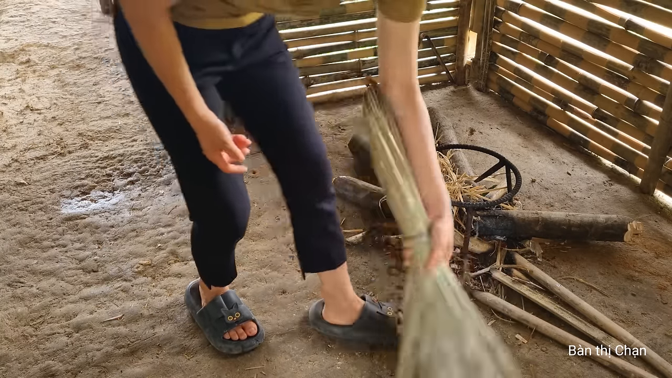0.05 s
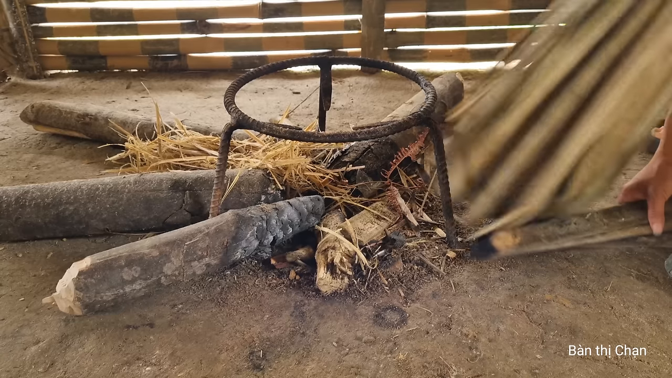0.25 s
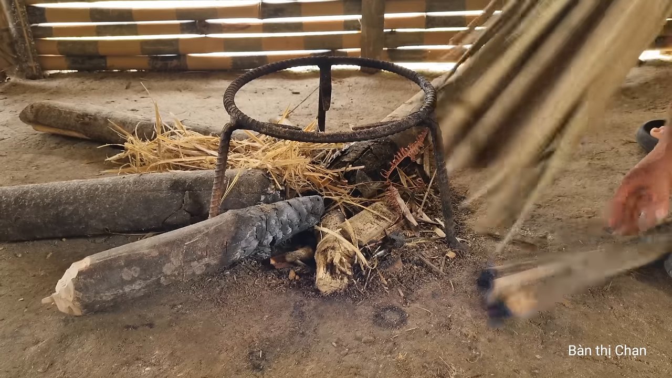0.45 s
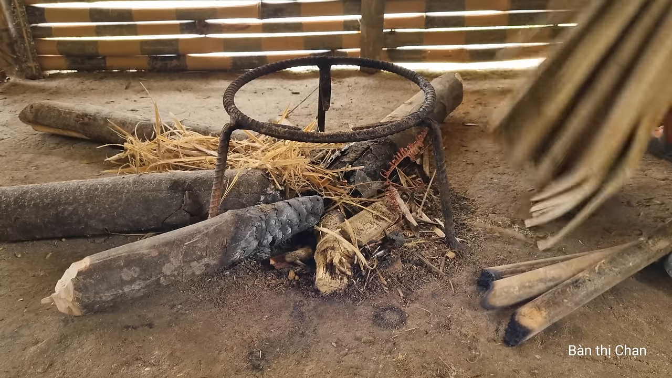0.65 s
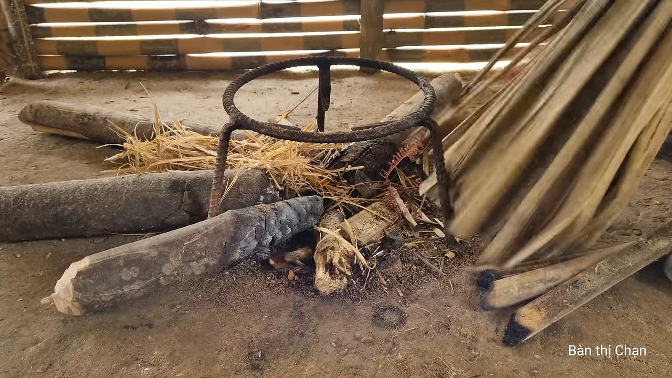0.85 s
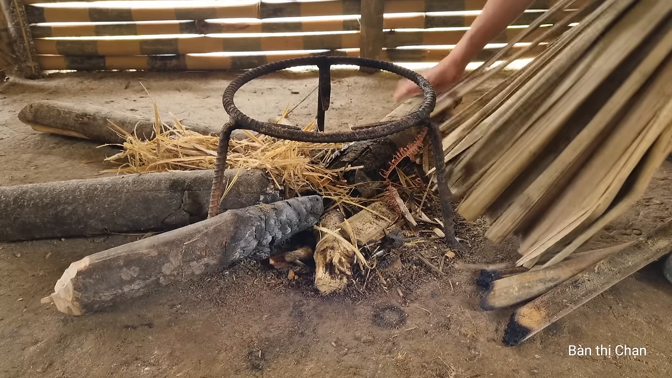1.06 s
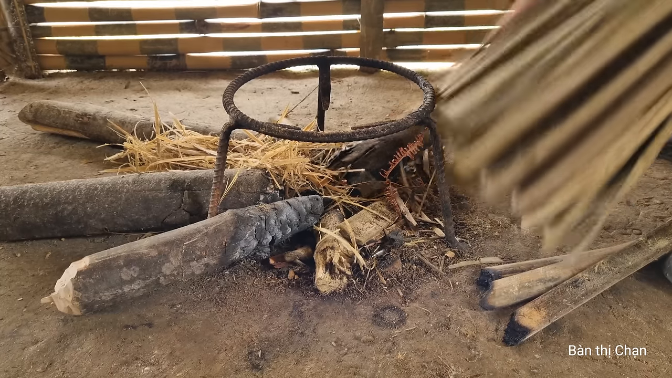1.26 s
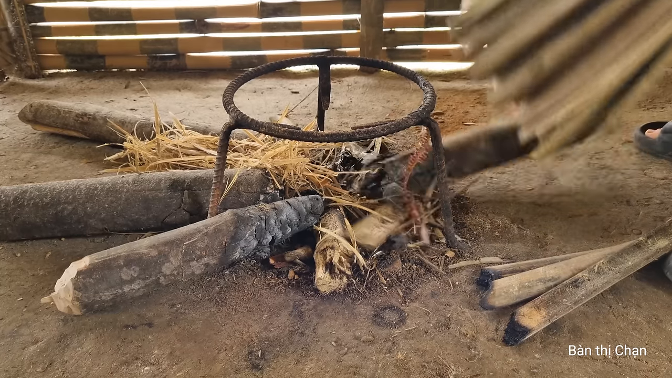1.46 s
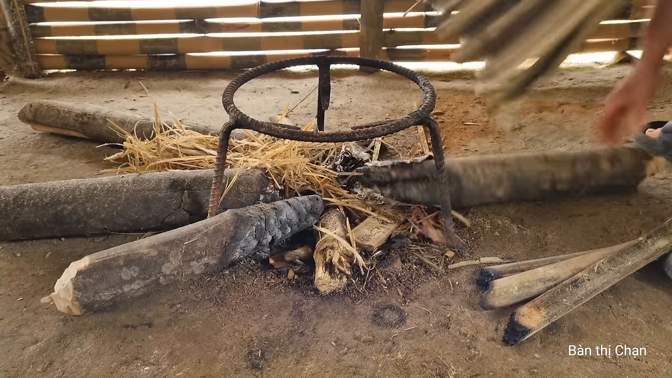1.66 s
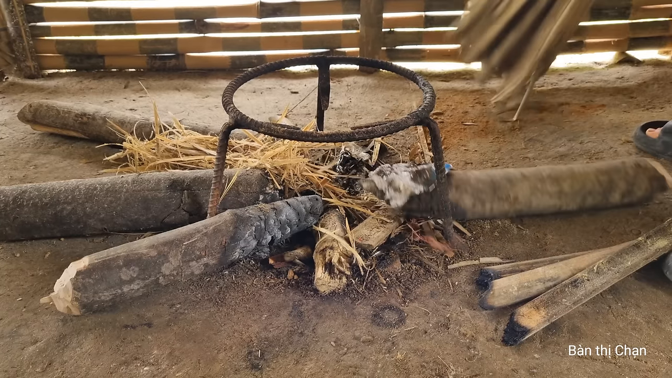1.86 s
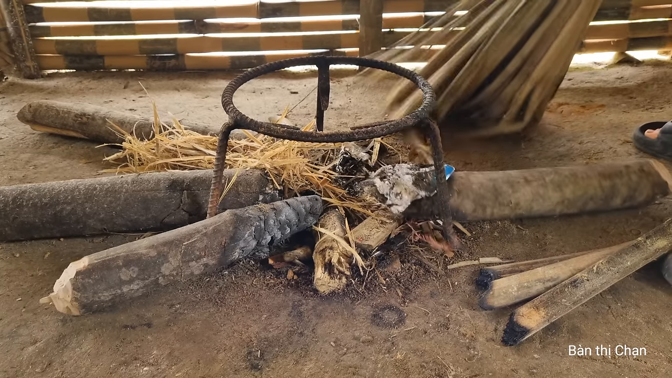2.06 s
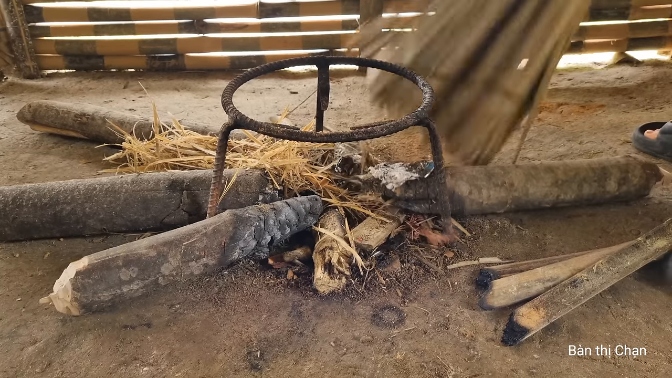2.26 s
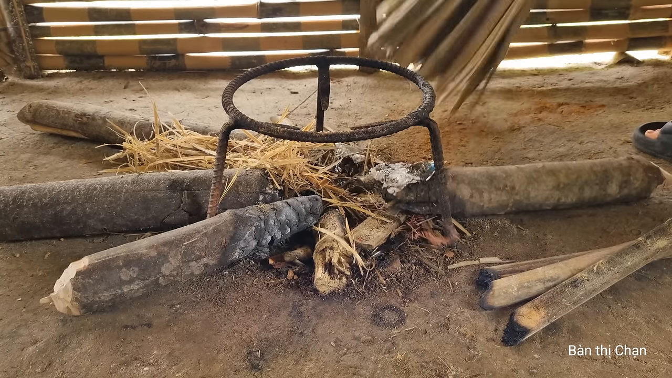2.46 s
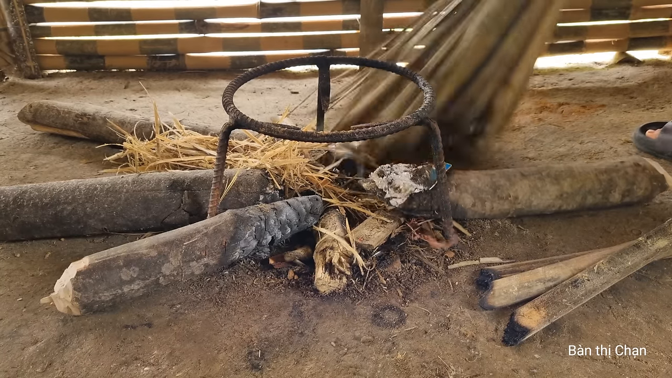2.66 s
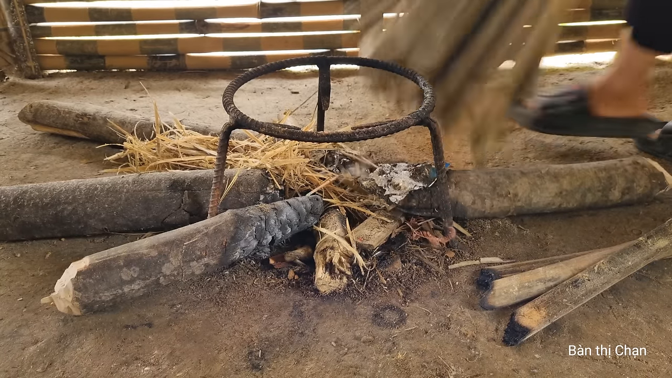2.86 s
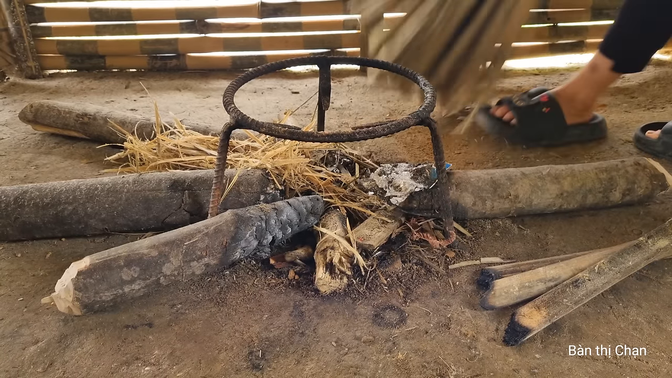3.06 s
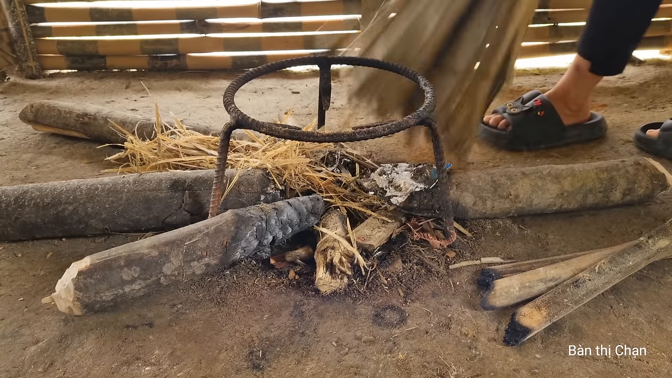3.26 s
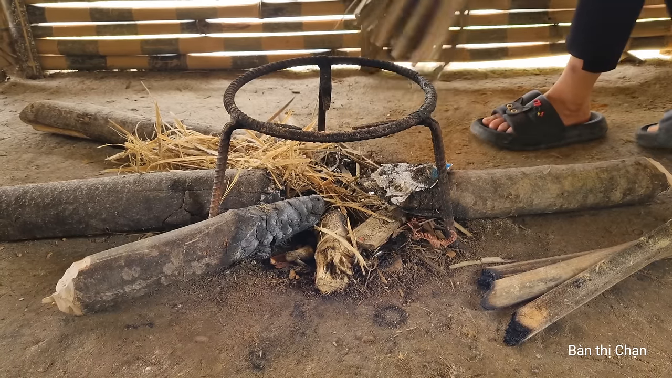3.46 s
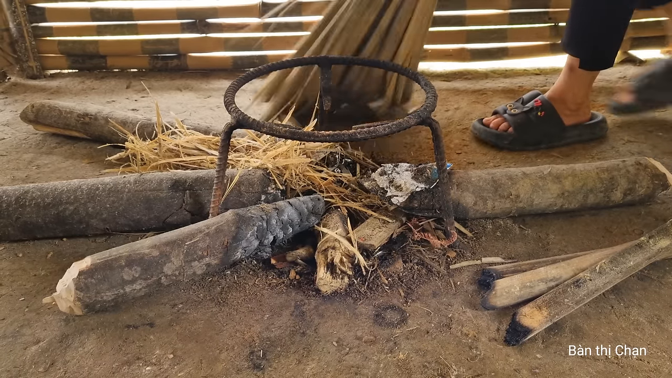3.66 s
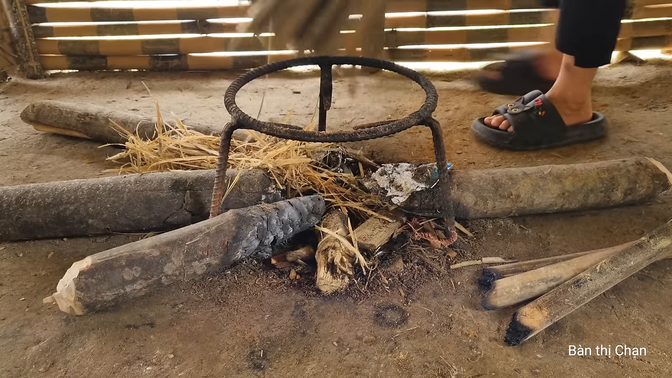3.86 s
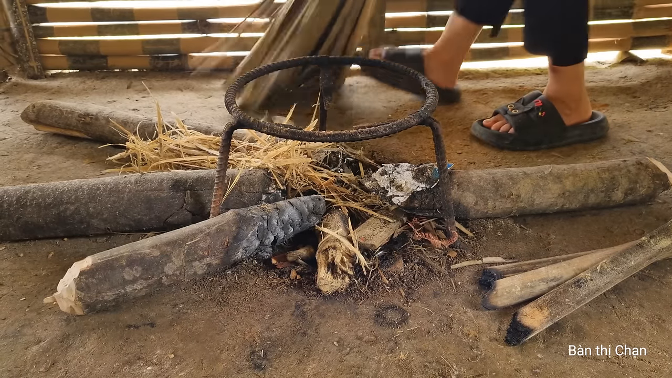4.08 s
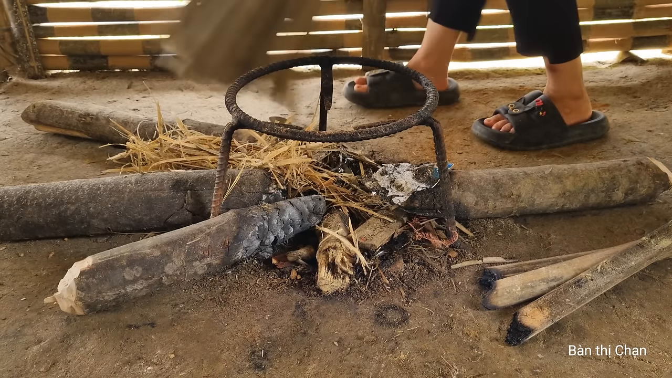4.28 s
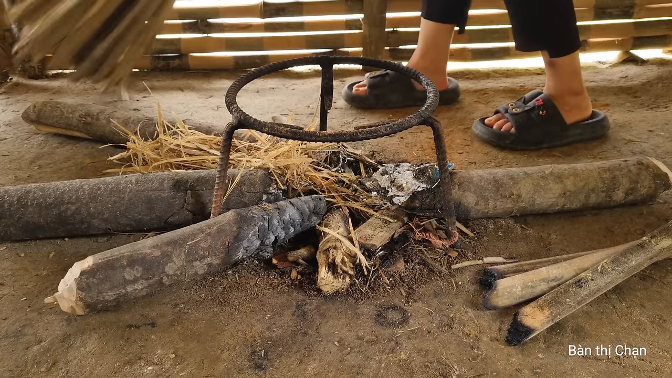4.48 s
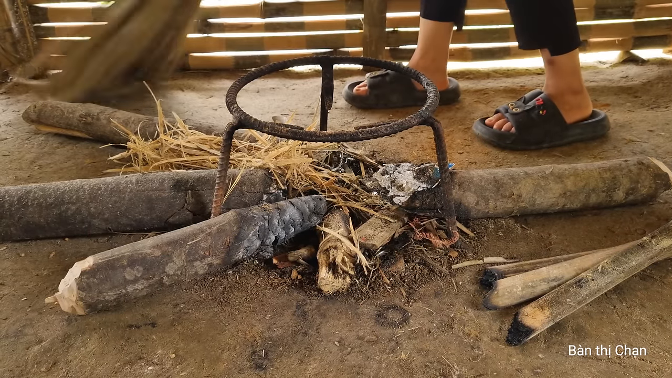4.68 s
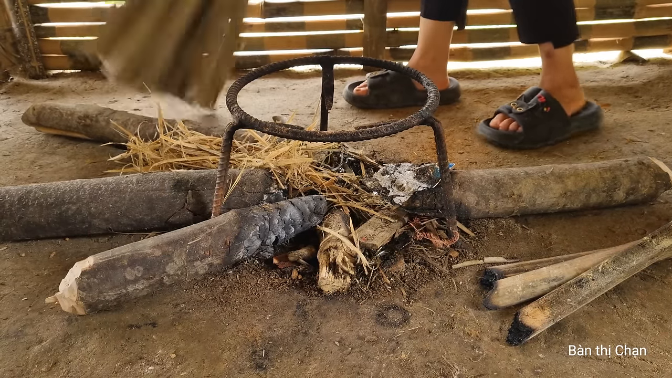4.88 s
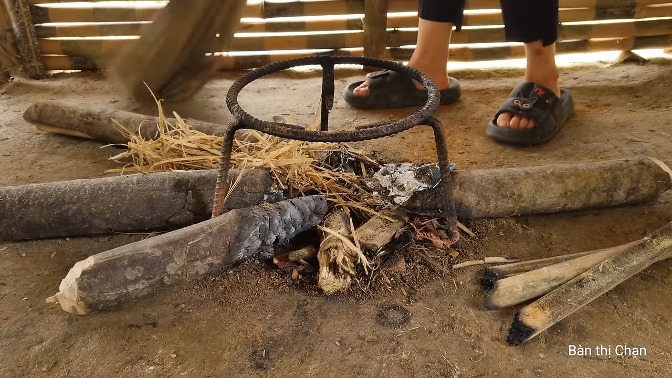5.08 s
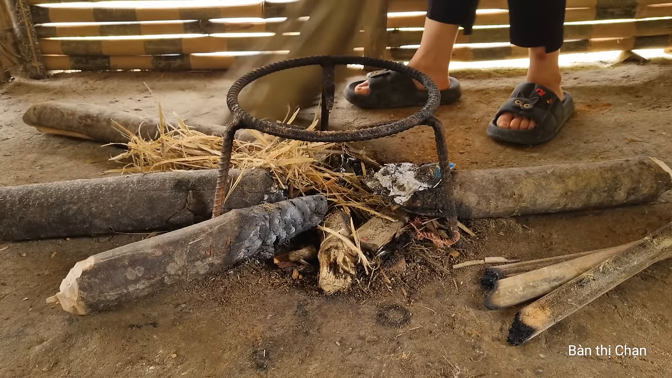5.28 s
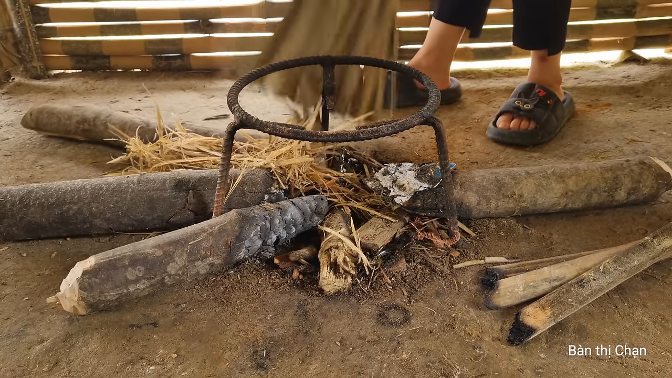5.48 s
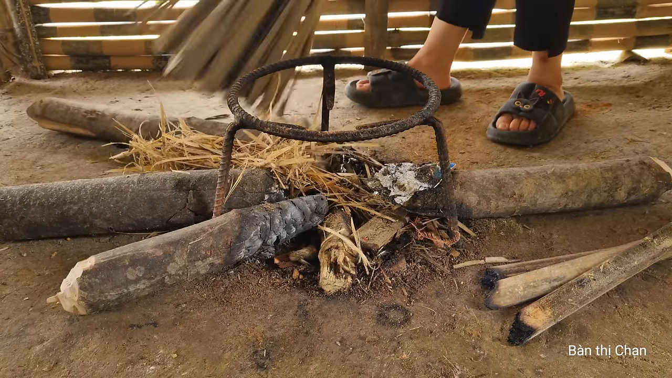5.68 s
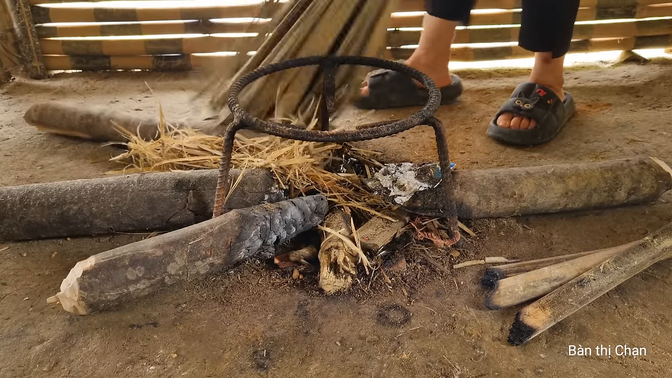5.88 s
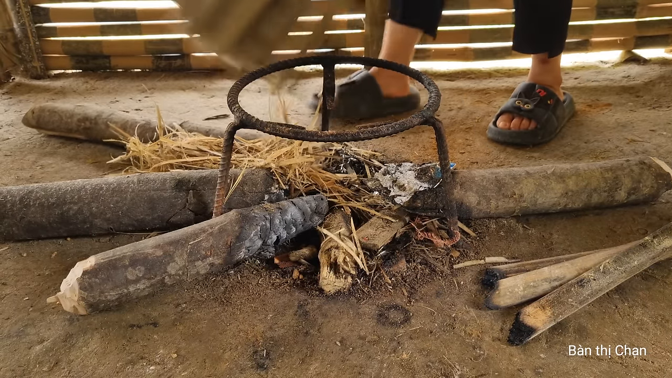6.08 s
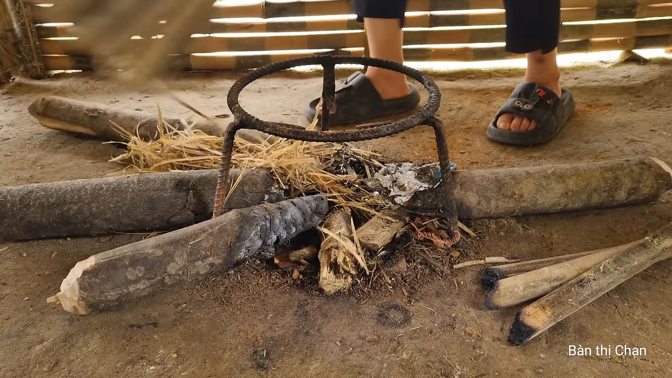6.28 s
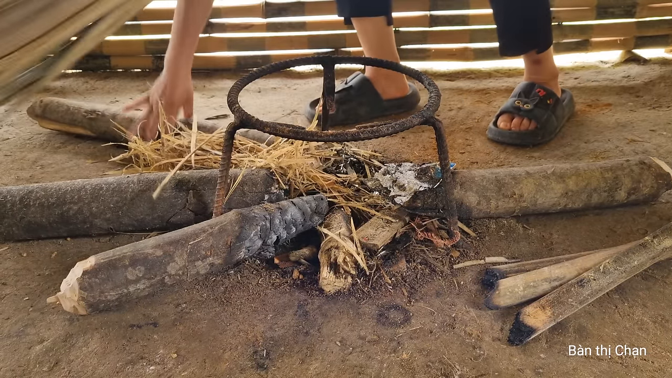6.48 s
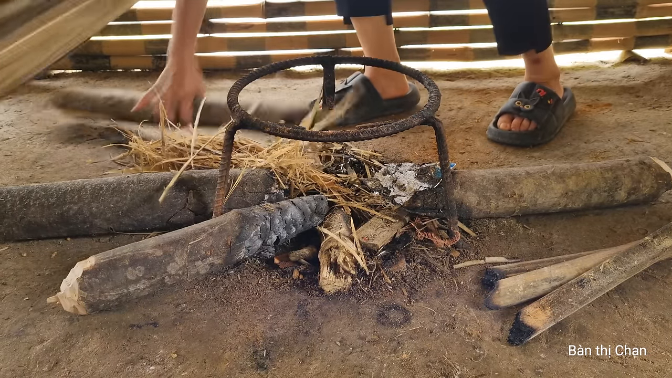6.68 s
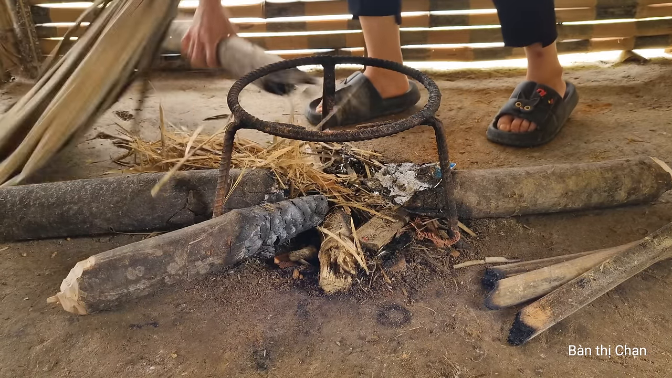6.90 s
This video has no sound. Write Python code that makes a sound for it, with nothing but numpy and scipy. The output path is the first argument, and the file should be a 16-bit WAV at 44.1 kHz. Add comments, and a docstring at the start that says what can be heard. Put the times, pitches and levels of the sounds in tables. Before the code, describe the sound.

A palm-leaf broom sweeps packed earth in brisk dry strokes; a stick clatters down, a log thuds softly, straw crackles and small scuffs follow.

```python
"""Broom on an earth floor

A palm-leaf broom sweeps the packed earth of a slatted bamboo hut, about two strokes a second:
noise bands for floor thrum, catching leaf tips and swishing blades follow each stroke's effort.
Noise puffs and ringing modes make a clattering stick, a thudding log, straw, scuffs, footfalls
and a hollow knock. Sparse dull echoes, a faint wavering low drone and a thin hiss lie behind.
"""
import sys
import numpy as np
from scipy import signal
from scipy.fft import rfft, irfft
from scipy.io import wavfile
from scipy.ndimage import map_coordinates

SR = 44100
rng = np.random.default_rng(int(sys.argv[2]) if len(sys.argv) > 2 else 0)


def wav_out(sig):
    """Save sig, one row per channel (or a flat mono array), as 16-bit PCM at SR to the path in sys.argv[1]."""
    wavfile.write(sys.argv[1], SR, np.round(np.clip(np.atleast_2d(sig).T, -1, 1) * 32767).astype(np.int16))


N = 306054
TIME_S = np.arange(N) / SR
CUTOFF_HZ = 15550
EFFORT_STEP = 32   # samples between effort readings

# All dB are relative: mix gains and filters follow.
# Broom strokes: (touchdown [s], contact length [s], settling time [s], drag [dB],
# push peak after touchdown [s], push half-width [s], push [dB], extra swish [dB], extra thrum [dB])
STROKES = [(0.0, .375, .025, -36.5, .19, .06, 13, -1.2, 0), (.41, .11, .04, -37, .09, .025, 2.5, 3, -3),
           (0.68, .36, .04, -47, .16, .076, 15.4, -1.4, -3), (1.195, .16, .02, -44, .08, .048, 4, .8, -5.5),
           (1.852, .47, .127, -32, .262, .045, 7.8, 0, .8),
           (2.528, .372, .04, -33.3, .157, .054, 10.3, .3, 1.5),
           (3.091, .227, .04, -32.5, .125, .041, 7.6, -1, 1),
           (3.51, .285, .025, -30.5, .175, .043, 5.8, 2.1, .5),
           (3.972, .353, .065, -40.5, .106, .134, 12, .4, -2), (4.52, .415, .068, -37, .31, .049, 9, 0, -1),
           (5.06, .493, .07, -35.5, .25, .11, 10.3, 0, -1.5),
           (5.749, .336, .053, -42, .12, 0.08, 14.3, -1.2, -1.5),
           (6.8, .18, .082, -38.6, .099, .022, 8, 2.5, -3)]
# Broom position: (time [s], left-ear lag [samples])
BEARING = [(0, 4), (2, 5), (3.4, 0.5), (4.2, -0.5), (4.8, -5.5), (5.4, -1.5), (6.9, -3.5)]
# Leaves and straw rustling, during and between strokes: (time [s], level [dB])
RUSTLE = [(0, -44), (.35, -36), (.59, -51), (.88, -34), (1.11, -53), (1.46, -43.5), (1.81, -55),
          (2.42, -53), (3.06, -52), (3.42, -50), (3.99, -42), (4.4, -52), (5.01, -46), (5.66, -53),
          (6.24, -50), (6.43, -55.5), (6.75, -55)]

# Spectra of floor thrum, leaf tips, blades, hiss: (frequency [Hz], gain [dB])
THRUM_SPECTRUM = [(22, -36), (33, -21), (45, -11.5), (62, 1), (85, 1.5), (140, -1.5), (195, 5.5),
                  (260, -1.5), (380, -2), (600, -38.5)]
SCRAPE_SPECTRUM = [(160, -27), (290, 1), (390, -7), (445, -2.5), (515, 4), (630, 1.5), (750, -1.5),
                   (1000, 0), (1600, -.5), (2300, -3.5), (3500, -8), (7000, -33), (15000, -26)]
SWISH_SPECTRUM = [(500, -15), (1400, -2.5), (2600, -0.5), (4000, 0), (6000, -2.5), (8100, -2), (9400, -7.5),
                  (15000, -7)]
AIR_SPECTRUM = [(20, -23), (45, -6), (120, -2.5), (450, -2), (1200, -29), (4000, 2), (7700, 3),
                (9500, -1.5), (15000, -3)]
# Spectra of stick contact, thud, straw snap, scuff: (frequency [Hz], gain [dB])
CLACK_SPECTRUM = [(30, -54), (100, -8), (300, -8), (600, 4.5), (800, -4), (1450, 10.5), (2100, -9.5),
                  (3000, 1.5), (3600, -2), (4400, 0), (5600, -1.5), (6500, -13), (8200, -7.5), (10000, -22),
                  (15000, -36)]
THUD_SPECTRUM = [(20, -38), (35, -13), (70, -3), (170, 3), (400, -4), (650, -9.5), (1200, -25), (1800, -15),
                 (2400, -25), (15000, -39)]
SNAP_SPECTRUM = [(40, -26), (300, -5.5), (1500, -27), (3500, -5.5), (6000, -2), (8300, -3), (10000, -5),
                 (15000, -6)]
SCUFF_SPECTRUM = [(30, -27), (100, 0), (400, -3), (900, 7), (1800, 5.5), (3000, 0.5), (5000, -7),
                  (8000, -7), (15000, -23)]
# Left-right likeness: (frequency [Hz], correlation [-1 to 1])
LIKENESS = [(60, 0.98), (280, 1), (540, 0.87), (820, 0.35), (1500, 0.32), (2600, 0.26), (4000, 0.042),
            (15000, .03)]
# Stereo balance: (frequency [Hz], left minus right [dB])
BALANCE = [(60, 2), (300, 1.6), (1000, 0), (2000, 1.2), (4500, -1), (8000, -3), (14000, -2.5)]

# Dry leaves and straw snap: (time [s], level [dB], t60 [s])
SNAPS = [(.717, -36, 0.067), (1.45, -34, .02), (1.462, -34, 0.056), (1.574, -37, .012), (1.618, -35, 0.09),
         (1.784, -33, 0.014), (1.881, -28.5, 0.043), (3.455, -34.5, 0.077), (4.608, -29, 0.021),
         (6.777, -27.5, 0.14)]
# Straw crackles under the moved log: (start [s], end [s])
CRACKLING = (1.39, 2.1)
# Broom, sandal or hand scuffs the ground: (time [s], level [dB], t60 [s])
SCUFFS = [(.122, -31, .11), (.634, -37, .06), (.771, -29, .078), (.884, -32, .09), (1.875, -34, .07),
          (2.528, -31, .042), (3.02, -44, .15), (3.091, -28.5, .05), (3.455, -36.5, .091),
          (3.5155, -22.5, .035), (3.729, -25, .07), (4.436, -40, .06), (4.52, -34, .07),
          (5.749, -37.5, .048), (5.804, -31, .05), (5.849, -21, .022), (5.951, -22.5, .076),
          (6.336, -40, .06), (6.3445, -30.5, .045), (6.778, -29.5, .096)]
# Wood and sandals bump the earth: (time [s], level [dB], t60 [s])
BUMPS = [(.63, -43, .25), (1.355, -45, .08), (3.015, -47, .15), (3.825, -41, .07)]
# Stick lands and bounces: (time [s], level [dB], noise t60 [s])
STICK_HITS = [(.5158, -9, 0.028), (.5198, -16, 0.037), (.5255, -22, 0.05), (.5365, -24, 0.07),
              (.546, -31.5, .05)]
# Stick modes: (frequency [Hz], level [dB], t60 [s])
STICK_MODES = [(580, -25, 0.055), (967, -7.5, .1), (1035, -14, .1), (1240, -6, 0.079), (1520, -4, 0.13),
               (1611, -18, .09), (1965, -8, 0.1), (2100, -6, 0.097), (2460, 0, 0.068), (2600, -5, 0.09),
               (2660, -5, .07), (2966, 0, 0.077), (3500, -15, .07), (4170, 8.5, 0.044), (4468, 3, .03),
               (5050, -3, 0.041)]
# Log drops on the earth: (time [s], level [dB], noise t60 [s])
LOG_HITS = [(1.6128, -22.5, 0.062), (1.6245, -38, 0.1)]
# Log modes: (frequency [Hz], level [dB], t60 [s])
LOG_MODES = [(184, -4, 0.15), (139, -12, 0.16), (240, -0.5, .025), (278, -9, 0.21), (442, -7, 0.065),
             (1790, -11, 0.046)]
# Sandals come down: (time [s], level [dB])
FOOTFALLS = [(2.575, -39), (4.06, -35)]
# Earth modes: (frequency [Hz], level [dB], t60 [s])
EARTH_MODES = [(48, -4, 0.17), (72.4, -1, .15)]
# Soft hollow knock: (time [s], level [dB], length [s])
KNOCK = (5.9565, -15.3, 0.006)
# Knock modes: (frequency [Hz], level [dB], tail t60 [s])
KNOCK_MODES = [(849, 2, 0.13), (1060, -21, .06), (1600, -18, .06), (2256, -10, .05)]
# Sudden low hollow rings at the drone's pitch, dying away: (time [s], level [dB], t60 [s])
DRONE_RINGS = [(2.43, -52, .35), (6.29, -49, .4), (6.52, -56, .25), (6.675, -55, .3)]

USUAL_EFFORT_DB = -30.0   # drag of an ordinary stroke
SWISH_DB, SWISH_FOLLOWS = -30.2, .81   # at usual effort; share of effort swing
THRUM_DB, THRUM_FOLLOWS = -43.3, .56   # likewise
LANDING_WEIGHT_DB, WEIGHT_EASES_S = 4.5, .09   # broom weight on the floor; time constant
TOUCH_DB, TOUCH_DB_PER_S, LIFT_DB_PER_S = -13, 900, 335   # light first touch, its onset, release
RUSTLE_SCRAPE_DB, RUSTLE_THRUM_DB = -7.5, -23   # middle and bass re treble
RUSTLE_UNEVEN_DB, RUSTLE_DRIFT_HZ = 1.2, 14
CRACKLE_DB, CRACKLE_SPREAD_DB, CRACKLE_T60_S = -41, 1.5, .016
DRONE_DB, DRONE_WANDER_DB = -60.5, 1.5


def from_db(db):
    """Amplitude ratio of a level."""
    return 10 ** (np.asarray(db) / 20)


def added_db(*levels_db):
    """Power sum of unrelated sounds."""
    return 10 * np.log10(sum(from_db(db) ** 2 for db in levels_db) + 1e-20)


def rms_one(x):
    """Scale to unit RMS."""
    return x / np.sqrt(np.mean(x ** 2) + 1e-20)


def in_time(rows):
    """Curve columns interpolated at every sample."""
    s, *columns = np.transpose(rows)
    return [np.interp(TIME_S, s, column) for column in columns]


def at_hz(points, hz):
    """Curve read on a log-frequency axis."""
    points = np.array(points)
    return np.interp(np.log(hz), np.log(points[:, 0]), points[:, 1])


def drift(rate_hz):
    """Smooth unit-spread chance: two-pole low-passed noise, made at SR / 40."""
    r = np.exp(-80 * np.pi * rate_hz / SR)
    noise = rng.standard_normal(N // 40 + 2002)
    slow = rms_one(signal.lfilter([1], [1, -2 * r, r * r], noise)[2000:])   # settled part
    return np.interp(np.arange(N) / 40, np.arange(len(slow)), slow)


def colour(x, gain_at, size=2048):
    """Minimum-phase filter of gain gain_at(Hz), by folded cepstrum."""
    hz = np.maximum(np.arange(size // 2 + 1) * SR / size, 1)
    cepstrum = irfft(np.log(gain_at(hz) + 1e-9))
    cepstrum[1:size // 2] *= 2
    cepstrum[size // 2 + 1:] = 0
    impulse = irfft(np.exp(rfft(cepstrum)))
    return signal.oaconvolve(x, impulse)[:N]


def voiced(pair, spectrum):
    """Power-preserving colour of two unrelated noises: alike in the bass, diffuse on top."""
    def gain(hz):
        return from_db(at_hz(spectrum, hz))

    def alike(hz):
        return np.clip(at_hz(LIKENESS, hz), -.99, .99)

    power = np.mean(gain(np.linspace(1, CUTOFF_HZ, num=2000)) ** 2) * 2 * CUTOFF_HZ / SR
    mid = colour(pair[0], lambda hz: gain(hz) * np.sqrt(1 + alike(hz)))
    side = colour(pair[1], lambda hz: gain(hz) * np.sqrt(1 - alike(hz)))
    return np.array([mid + side, mid - side]) / np.sqrt(2 * power)


def dying(rows):
    """Envelope of sharp starts that decay exponentially."""
    power = np.zeros(N)
    for s, db, t60_s in rows:
        start = round(s * SR)
        since_s = TIME_S[:min(N - start, int(2 * t60_s * SR))]
        power[start:start + len(since_s)] += from_db(db - 60 * since_s / t60_s) ** 2
    return np.sqrt(power)


def bursts(rows):
    """Contacts as decaying puffs of noise."""
    return dying(rows) * rng.standard_normal((2, N))


def ring(clicks, hz, t60_s):
    """Resonator: a unit click starts a decaying sine of about unit height."""
    r, w = from_db(-60 / (t60_s * SR)), 2 * np.pi * hz / SR
    return signal.lfilter([0, np.sin(w)], [1, -2 * r * np.cos(w), r * r], clicks + 1e-18)


def struck(hits, modes):
    """Each blow rings all modes at slightly random strength, with its own delay to each ear."""
    out = np.zeros((2, N))
    for k, (hz, mode_db, t60_s) in enumerate(modes):
        clicks = np.zeros(N)
        for s, db, *_ in hits:
            clicks[round(s * SR)] += from_db(db + mode_db + rng.normal(0, 1))
        tone = ring(clicks, hz, t60_s) * (-1) ** k
        out += [np.roll(tone, rng.integers(12)) for ear in range(2)]   # one delay per mode and ear
    return out


def slips(per_s, spread_db):
    """Tiny catches and releases of uneven size; unit power at any rate."""
    chance = np.clip(per_s / SR, 1e-4, 1)
    sizes = from_db(spread_db * np.minimum(rng.exponential(1, N), 4))
    pulses = (rng.random(N) < chance) * sizes / np.sqrt(chance)
    return rms_one(pulses * rng.standard_normal((2, N)))


def flexing(pair, low_hz, high_hz, ring_db, count):
    """Dry blades ring a few cycles, each at its own pitch; bending shifts the colour."""
    out = pair.copy()
    for hz in np.geomspace(low_hz, high_hz, num=count):
        top, bottom = signal.iirpeak(hz, 9, fs=SR)
        bend = from_db(ring_db) * drift(30)
        out += bend * signal.lfilter(top, bottom, pair + 1e-18)
    return out


def sweeping():
    """Touchdown, drag, arm push and lift give an effort that sets thrum, scrape, swish [dB]."""
    step_s = TIME_S[::EFFORT_STEP]
    thrum, scrape, swish = [], [], []
    for (s, length_s, settle_s, drag_db, push_after_s, push_width_s, push_db,
         bright_db, heavy_db) in STROKES:
        since_s = step_s - s
        landing_db = TOUCH_DB * np.clip(1 - since_s / settle_s, 0, 1)
        landing_db += TOUCH_DB_PER_S * np.minimum(since_s, 0)
        push = np.exp(-.5 * ((since_s - push_after_s) / push_width_s) ** 2)
        lift_db = LIFT_DB_PER_S * np.maximum(since_s - length_s, 0)
        effort_db = drag_db + push_db * push - lift_db - USUAL_EFFORT_DB
        weight_db = LANDING_WEIGHT_DB * np.exp(-np.maximum(since_s, 0) / WEIGHT_EASES_S)
        thrum.append(THRUM_DB + THRUM_FOLLOWS * effort_db + landing_db + heavy_db + weight_db)
        scrape.append(USUAL_EFFORT_DB + effort_db + landing_db)
        swish.append(SWISH_DB + SWISH_FOLLOWS * (effort_db + landing_db) + bright_db)
    rustle_db = (in_time(RUSTLE)[0] + RUSTLE_UNEVEN_DB * drift(RUSTLE_DRIFT_HZ))[::EFFORT_STEP]
    levels_db = (added_db(*thrum, rustle_db + RUSTLE_THRUM_DB),
                 added_db(*scrape, rustle_db + RUSTLE_SCRAPE_DB),
                 added_db(*swish, rustle_db))
    return [np.interp(TIME_S, step_s, level_db) for level_db in levels_db]


def broom():
    """Harder strokes bring more tips to the ground; whole bunches catch and let go together."""
    thrum_db, scrape_db, swish_db = sweeping()
    bunches = drift(42)
    per_s = 5500 * from_db(.5 * (scrape_db - USUAL_EFFORT_DB))

    floor = slips(per_s=800, spread_db=1.3)
    thrum = voiced(floor * from_db(thrum_db + 1.9 * drift(35) - 0.5), THRUM_SPECTRUM)

    tips = flexing(slips(per_s * .6, spread_db=1.1), low_hz=555, high_hz=2985, ring_db=-6.5, count=14)
    scrape = voiced(tips * from_db(scrape_db + 0.88 * bunches - 1.5), SCRAPE_SPECTRUM)

    rubbing = 0.64 * slips(per_s * 1.3, spread_db=2.5) + 0.69 * rng.standard_normal((2, N))
    blades = flexing(rubbing, low_hz=1780, high_hz=8020, ring_db=-11.5, count=14)
    swish = voiced(blades * from_db(swish_db + 0.5 * bunches + 0.67), SWISH_SPECTRUM)

    left, right = thrum + scrape + swish
    lag, = in_time(BEARING)
    return np.array([map_coordinates(left, [np.arange(N) - lag], order=3), right])


def background(drone_hz, air_db):
    """Sine drone, unsteady in pitch and strength, with sudden dying rings, over a thin hiss."""
    level = np.hypot(from_db(DRONE_DB + DRONE_WANDER_DB * drift(2.1)), dying(DRONE_RINGS))
    pitch_hz = drone_hz + 24 * drift(90)
    strength = level * from_db(2.5 * drift(35))
    drone = strength * np.sin(2 * np.pi * np.cumsum(pitch_hz) / SR)
    return drone + from_db(air_db) * voiced(rng.standard_normal((2, N)), AIR_SPECTRUM)


def crackles(count):
    """Stalks give way one by one at uneven moments: rows (time [s], level [dB], t60 [s])."""
    start_s, end_s = CRACKLING
    rows = []
    for k in range(count):
        s = start_s + (end_s - start_s) * (k + rng.random()) / count
        db = CRACKLE_DB + CRACKLE_SPREAD_DB * rng.standard_normal()
        rows.append((s, db, CRACKLE_T60_S))
    return rows


def litter():
    """Noise puffs: bright straw snaps, duller scuffs, soft bumps on the earth."""
    snaps = voiced(bursts(list(SNAPS) + crackles(count=9)), SNAP_SPECTRUM)
    scuffs = voiced(bursts(SCUFFS), SCUFF_SPECTRUM)
    bumps = voiced(bursts(BUMPS), THUD_SPECTRUM)
    return from_db(1.5) * snaps + from_db(-0.5) * scuffs + bumps


def firewood():
    """Contact noise plus ringing modes: a stick clatters, a log lands dully."""
    clack = voiced(bursts(STICK_HITS), CLACK_SPECTRUM)
    stick = from_db(0.5) * clack + from_db(-12.0) * struck(STICK_HITS, STICK_MODES)
    thud = voiced(bursts(LOG_HITS), THUD_SPECTRUM)
    log = thud + from_db(-1.0) * struck(LOG_HITS, LOG_MODES)
    return stick + log


def footfalls():
    """Sandals make the earth boom in two low modes."""
    return struck(FOOTFALLS, EARTH_MODES)


def knock(tail_db):
    """A soft contact swells and fades within milliseconds, leaving a faint ring."""
    s, db, length_s = KNOCK
    since_s, out = TIME_S - s, 0
    contact = np.exp(-(since_s / length_s) ** 2)
    for hz, mode_db, t60_s in KNOCK_MODES:
        decay_db = 60 * np.minimum(abs(since_s) / t60_s, 3)
        tail = (since_s > 0) * from_db(tail_db - decay_db)
        tone = np.sin(2 * np.pi * hz * since_s)
        out = out + from_db(db + mode_db) * np.maximum(contact, tail) * tone
    return out


def hut(x, t60_s, wall_cut_hz, count=70):
    """Open slats return sparse, short, dull echoes, different at each ear."""
    echoes = np.zeros((2, SR // 4))
    for ear in echoes:
        delay_s = .002 + .15 * rng.random(count) ** 2
        ear[(delay_s * SR).astype(int)] = rng.choice([-1, 1], count) * from_db(-60 * delay_s / t60_s)
    echoes /= np.sqrt(np.sum(echoes ** 2, axis=1, keepdims=True))
    walls = signal.butter(1, [450, min(wall_cut_hz, CUTOFF_HZ)], "band", fs=SR, output="sos")
    return signal.sosfilt(walls, signal.oaconvolve(x, echoes, axes=1)[:, :N])


def scene():
    """Work, its echoes and the background, a little brighter on the right."""
    work = broom() + litter() + firewood() + footfalls() + knock(tail_db=-21)
    echoes = from_db(-10.0) * hut(work, t60_s=0.22, wall_cut_hz=7400)
    sound = work + echoes + background(drone_hz=305.3, air_db=-56)
    return np.array([colour(ear, lambda hz: from_db(sign * at_hz(BALANCE, hz) / 2))
                     for ear, sign in zip(sound, (1, -1))])


def record(dry):
    """High-pass at 33 Hz and steep low-pass at CUTOFF_HZ."""
    lean = signal.sosfilt(signal.butter(3, 33, "high", fs=SR, output="sos"), dry)
    return signal.sosfilt(signal.ellip(12, .1, 80, CUTOFF_HZ, fs=SR, output="sos"), lean)


dry = scene()
out = record(dry)
wav_out(out)
```